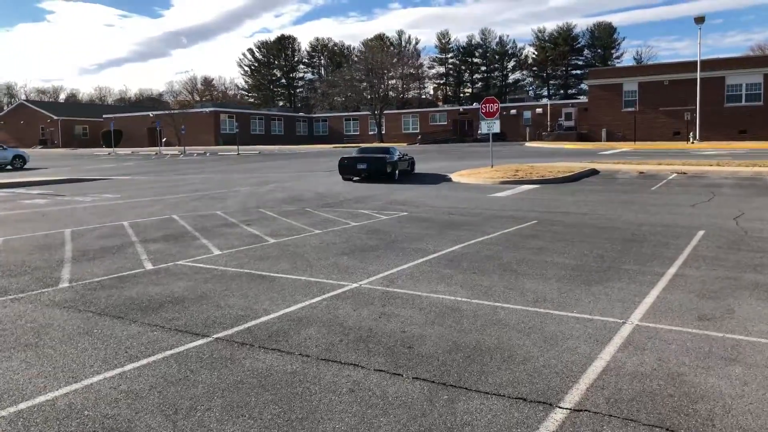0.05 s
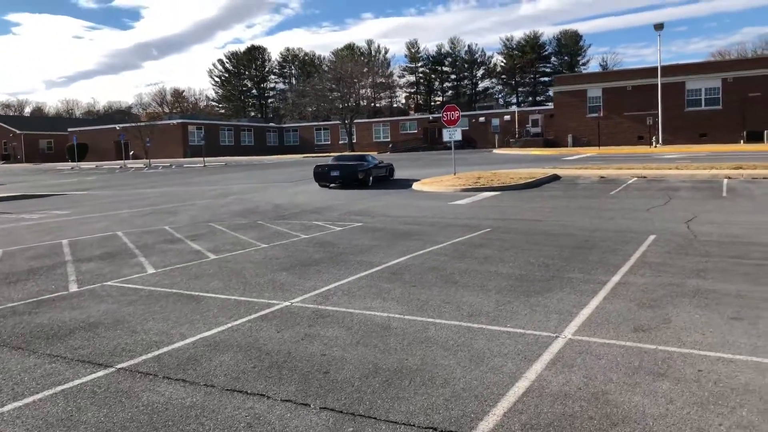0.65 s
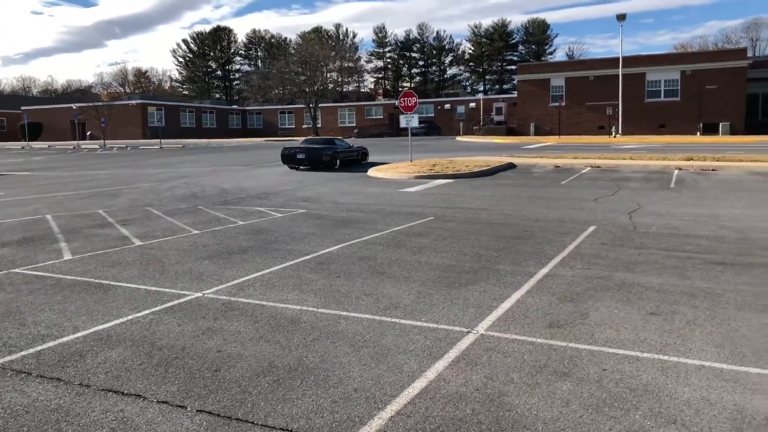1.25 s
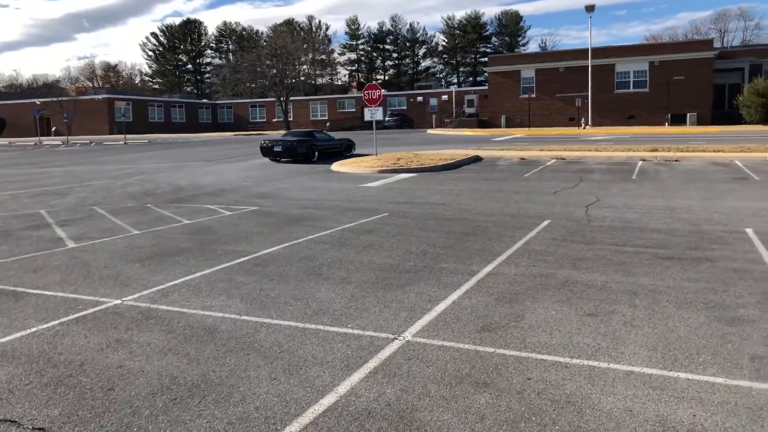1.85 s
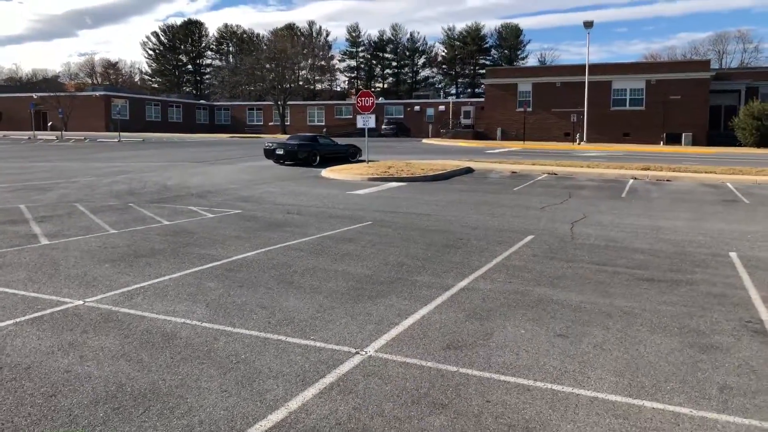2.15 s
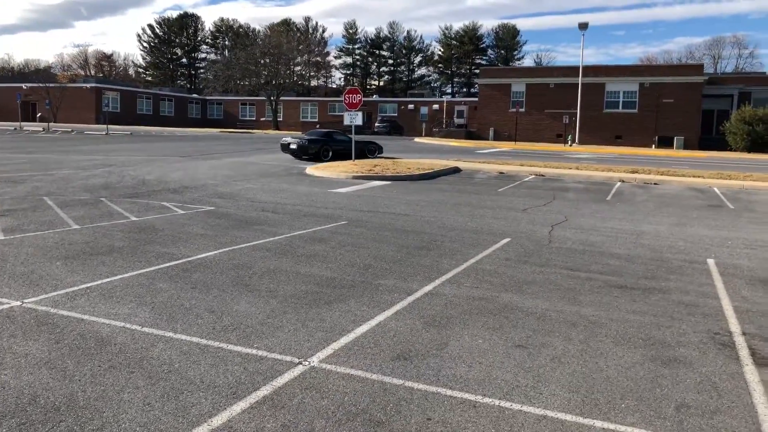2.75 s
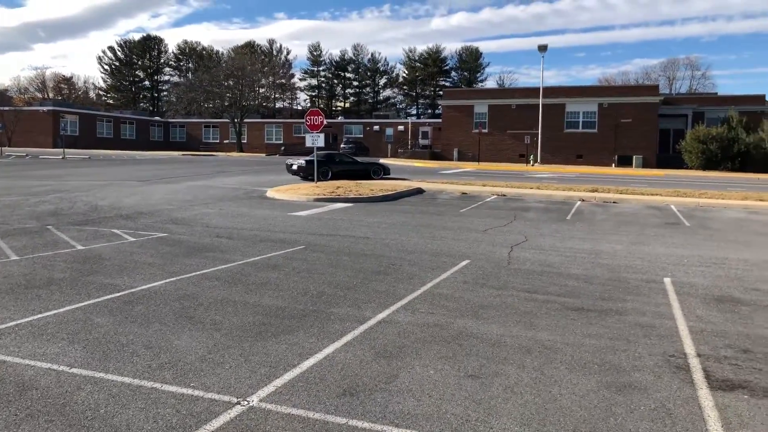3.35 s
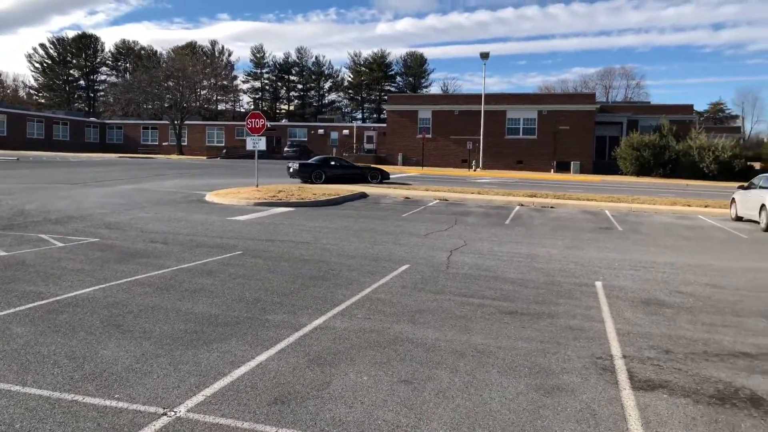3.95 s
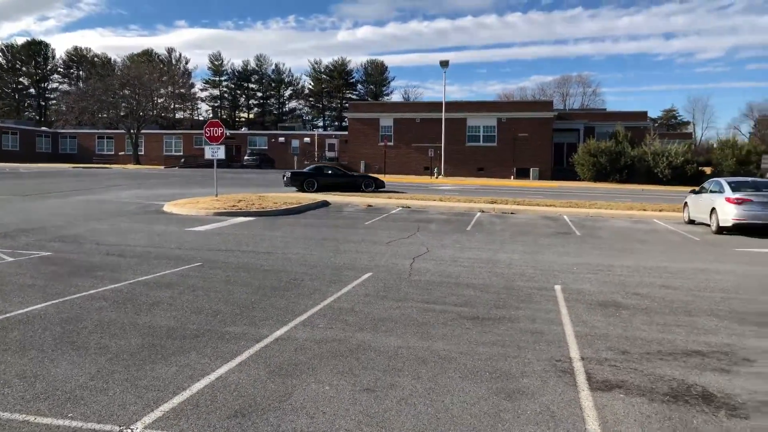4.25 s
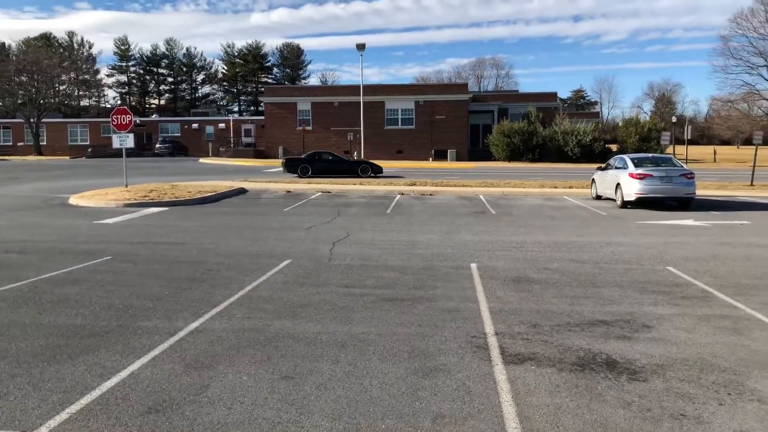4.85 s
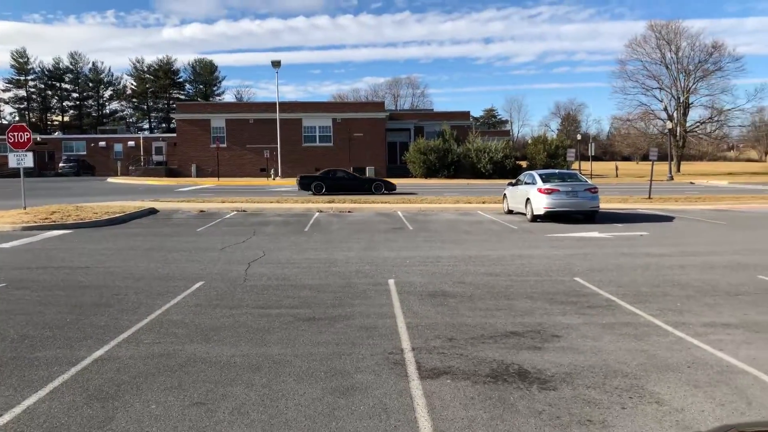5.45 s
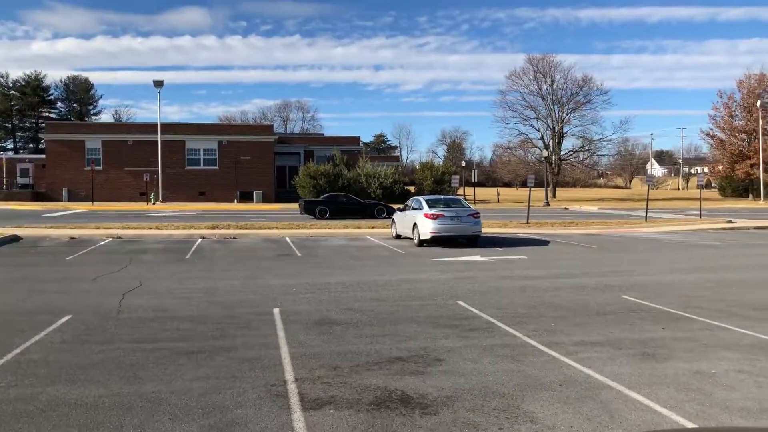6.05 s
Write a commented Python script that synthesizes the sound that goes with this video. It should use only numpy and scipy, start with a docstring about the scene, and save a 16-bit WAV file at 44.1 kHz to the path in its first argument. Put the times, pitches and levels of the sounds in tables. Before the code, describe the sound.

A sports car's open exhaust rumbles unevenly, then rises to a loud drone as it pulls away, with wind rustling the microphone.

```python
"""A V8 pulling away

A sports car with an open exhaust lopes across a parking lot, then pulls away and opens the throttle.
Each firing is a pressure pulse that excites the resonances of the pipes. At idle the uneven pulses
thump; as the revs rise they merge into a drone, and turbulent gas adds a rasping roar.
Gusts rustle and tick at the microphone over a wash of tyres, breeze and trees."""
import sys
import numpy as np
from scipy import signal
from scipy.fft import rfft, irfft
from scipy.io import wavfile
from scipy.ndimage import uniform_filter1d

SR = 44100
rng = np.random.default_rng(int(sys.argv[2]) if len(sys.argv) > 2 else 0)


def pcm_store(signal):
    """Save signal as 16-bit PCM."""
    levels = np.round(np.clip(np.atleast_2d(signal), -1, 1) * 32767)
    wavfile.write(sys.argv[1], SR, levels.astype(np.int16).T)


N = 269010
TIME = np.arange(N) / SR
IDLE_HZ = 56.2  # firings a second
TURN_START_S, TURN_LENGTH_S = 1.09, 1.42  # the tailpipes face the listener, then turn side-on

# engine speed: (time [s], firing rate [Hz])
FIRING_RATE = [(0.0, 48.0), (0.29, 49.1), (0.78, 47.2), (1.1, 46), (1.87, 60.5), (2.09, 48.5), (2.44, 53.4),
               (2.92, 45.1), (3.52, 60), (3.74, 58), (4.08, 66.5), (4.3, 79.2), (4.5, 83.8), (4.8, 96.5),
               (5.13, 96.2), (5.35, 103), (5.65, 117.8), (5.86, 119.7), (6.1, 130.5)]
def revs():
    """Engine speed as a frequency ratio, in octaves above idle."""
    return np.log2(curve(FIRING_RATE) / IDLE_HZ)


# how hard the engine works: (time [s], effort [dB])
EFFORT = [(0, 9.5), (.2, 4), (.46, 1.5), (.97, -4.5), (1.17, -7.5), (1.35, -4), (1.89, 0.5), (2.06, -9.5),
          (2.29, -12.5), (2.46, -10.5), (2.9, -7.5), (3.37, -2), (3.45, 2.1), (4.15, 2), (4.38, 8),
          (4.63, 5.5), (5.3, 3.5), (6.1, 7)]
def driven(db, per_effort, octave_db, behind_db, floored_db):
    """Source strength and directivity: a voice's gain follows effort, revs, heading and full throttle."""
    behind = 1 - ramp(TURN_START_S, TURN_LENGTH_S)
    floored = ramp(start_s=5.86, length_s=0.14)
    working_db = db + per_effort * curve(EFFORT) + octave_db * revs()
    return gain_of(working_db + behind_db * behind + floored_db * floored)


# the cylinders in firing order: (departure from the mean strength [ratio])
CYLINDERS = [0.92, -0.68, -0.33, -0.6, 0.46, -0.074, -0.73, 0.044]
def firings(turns, jitter_s=0.0003, scatter_per_octave=0.53):
    """Cyclic variation: burns differ, less so at high revs. Gives the uneven and even pulse trains."""
    at = np.flatnonzero(np.diff(np.floor(turns)) > 0)
    burn, late = rng.standard_normal((len(at), 2)).T
    sizes = np.resize(CYLINDERS, len(at)) + scatter_per_octave ** revs()[at] * burn
    seconds = TIME[at] + jitter_s * late
    return impulses(seconds, sizes), impulses(seconds, np.ones(len(at)))


# pipe responses, low to high, the boom at low and at high revs: (frequency [Hz], relative gain [dB])
BOOM = [(20, -59.5), (38, -28), (48, -12), (60, 3.5), (80, 5), (100, -5), (122, -2), (145, -16.5),
        (200, -38)]
BOOM_REVVED = [(20, -51), (40, -27), (52, 0.5), (62, -7.5), (78, -2.5), (98, 0.5), (120, -8.5), (145, -40),
               (200, -79)]
BURBLE = [(90, -47.5), (130, 0), (155, 2), (185, 9), (235, 2.5), (260, -14.5), (330, -25.5)]
HOLLOW = [(160, -36), (190, -4), (215, 1), (238, -5), (270, -26), (330, -43)]
GROWL = [(200, -18.5), (245, -10), (278, -1), (298, 3.5), (335, -6), (375, -11), (420, -25), (600, -31.5)]
BARK = [(250, -46.5), (335, 2), (388, 6), (440, -6), (515, -6), (560, -0.5), (600, -1), (645, 1), (715, -5),
        (775, -2), (900, -27), (1300, -36), (2500, -56)]
def exhaust(turns, even_share=0.77):
    """Source and filter: uneven firings, smeared by reflections, ring five resonances of the pipes."""
    uneven, even = firings(turns)
    boom_pulses = reverberated(uneven, tail_db=1.5, t60=0.93)
    mid_pulses = reverberated(uneven, tail_db=2.0, t60=0.25)
    bark_pulses = reverberated(uneven + even_share * even, tail_db=5.5, t60=0.35)
    hollow_pulses = reverberated(uneven, tail_db=5.5, t60=0.6)
    revved = np.clip((curve(FIRING_RATE) - 65) / 30, 0, 1)
    deep = colour(boom_pulses * (1 - revved), BOOM) + colour(boom_pulses * revved, BOOM_REVVED)
    boom = steadied(deep, 0.51)
    boom *= driven(-28, per_effort=-0.22, octave_db=3, behind_db=0.2, floored_db=-2)
    burble = steadied(colour(mid_pulses, BURBLE), 0.042)
    burble *= driven(-34, per_effort=0.53, octave_db=-0.5, behind_db=2, floored_db=7.5)
    hollow = steadied(colour(hollow_pulses, HOLLOW), 0.1)
    hollow *= driven(-39.5, per_effort=0.35, octave_db=-2.5, behind_db=-14, floored_db=2)
    growl = steadied(heated(mid_pulses, GROWL), 0.051)
    growl *= driven(-28, per_effort=1.31, octave_db=-9, behind_db=-10, floored_db=11.5)
    bark = steadied(colour(bark_pulses, BARK), 0.19)
    bark *= driven(-46.5, per_effort=1.38, octave_db=5, behind_db=-0.5, floored_db=13)
    return boom + burble + hollow + growl + bark


def heated(x, response, cool_pitch=0.94, hot_pitch=1.023, hot_octaves=0.67):
    """Sound travels faster in hot gas, so a resonance shifts upwards as the revs heat the pipe."""
    hot = np.clip(revs() / hot_octaves, 0, 1)
    cool_ring = colour(x * np.sqrt(1 - hot), [(hz * cool_pitch, db) for hz, db in response])
    hot_ring = colour(x * np.sqrt(hot), [(hz * hot_pitch, db) for hz, db in response])
    return cool_ring + hot_ring


# the engine lopes off the throttle and fires evenly while it pulls: (time [s], lope [0-1])
LOPING = [(.05, 0.96), (1.1, 0.63), (1.3, 0.12), (1.88, 0.18), (2.02, 0.4), (2.85, 0.83), (3.08, 0)]
# pipe resonances: (frequency [Hz], peak gain [dB], bandwidth [Hz])
DRONE_MODES = [(51, -24, 28), (78.8, -19.5, 12.8), (116.2, -21.5, 14), (157, -24, 22), (196.7, -23, 21),
               (220, -24.5, 15), (258.5, -27, 11), (288.4, -20, 12.5), (324.6, -22, 15), (384, -38, 20),
               (645, -46, 50), (770, -47, 50)]
# harmonics 1, 2, ...: (relative level [dB], gain loping [dB], from behind [dB], at full throttle [dB])
HARMONICS = [(-2, -14, 4, 2.5), (-6, -13, 8, 7), (-12, -0.5, 9.5, 12), (-12, -8, 3, 3),
             (-18.5, 15.5, -8.5, 27), (-26, 2, 1, 31)]
def drone(turns, waver_db=2.0, per_effort=0.93):
    """Forced vibration: each harmonic of the firing rate swells as it passes a pipe resonance."""
    out, firing_hz = np.zeros(N), curve(FIRING_RATE)
    for k, (db, loping_db, behind_db, floored_db) in enumerate(HARMONICS, 1):
        power = sum(gain_of(mode_db) ** 2 * resonance(k * firing_hz, hz, width)
                    for hz, mode_db, width in DRONE_MODES)
        level = driven(db, per_effort, 0, behind_db, floored_db)
        level *= gain_of(loping_db * curve(LOPING) + waver_db * wander(0.031))
        out += np.sqrt(2 * power) * level * np.sin(2 * np.pi * (k * turns + rng.random()))
    return out


# lulls between the lumps of the idle: (centre time [s], length [s], exhaust gain [dB])
LULLS = [(0.045, 0.033, -8.5), (0.47, 0.072, -3), (0.562, 0.043, -1.5), (0.796, 0.022, -7),
         (1.013, 0.045, -2), (1.125, 0.087, -3.5), (1.222, 0.036, -4), (1.47, 0.019, -7),
         (1.546, 0.029, -6), (1.59, 0.021, -0.5), (2.114, 0.081, -7.5), (2.26, 0.062, -6),
         (2.39, 0.021, -6), (2.59, 0.047, -5), (2.693, 0.035, -1.5), (2.863, 0.015, -15),
         (3.273, 0.014, -2)]
def lope(weak_per_s=4., dip_s=0.026, depth_db=-7.5, gone_octaves=0.18, sag_db=-0.5):
    """Amplitude modulation: the exhaust sags off the throttle, in lulls and on weak burns near idle."""
    weak_burns = (rng.random(N) < weak_per_s / SR) * rng.uniform(0.22, 1.0, N)
    dips = signal.oaconvolve(weak_burns, signal.windows.hann(int(2 * dip_s * SR)), "same")
    near_idle = np.clip(1 - revs() / gone_octaves, 0, 1)
    lull_db = sum(db * swell(s, length) for s, length, db in LULLS)
    return gain_of(lull_db + sag_db * curve(LOPING) + depth_db * np.minimum(dips, 2) * near_idle)


# hard firings, in the lope and at the first push of the throttle: (time [s], relative level [dB])
CHUFFS = [(0.064, -25), (0.123, -2), (0.155, -2), (0.211, 3), (0.268, 3), (0.316, -13), (0.388, -2.5),
          (0.503, -1.5), (0.584, -7), (0.617, -6.5), (0.655, -5), (0.705, -6), (0.827, -8.5), (0.925, -6),
          (0.963, -4.5), (1.05, -7.5), (1.185, -11), (1.362, -7), (1.432, -3), (1.514, -11), (1.565, -7),
          (1.683, -5), (1.731, -2.5), (1.765, -17), (1.864, -0.5), (4.323, -2), (4.372, 5), (4.385, 1),
          (4.423, 4.5)]
# the pipe modes they ring: (frequency [Hz], relative level [dB], time constant [s])
CHUFF_MODES = [(86, -8, 0.0078), (149.6, -3.5, 0.0051), (256, -9.5, 0.0033), (344, -13, 0.0018),
               (512, -22.5, 0.0075), (666, -29, 0.0013)]
def chuffs(level_db=-10.0, detune=0.068, thinning_db=18., bark_hz=322.0):
    """Damped modes: a hard firing thumps, never at quite the same pitch; higher revs thin its bass."""
    t, out = TIME[:SR // 5], np.zeros(N + SR)
    octaves = np.maximum(revs(), 0)
    detunings = 1 + detune * rng.standard_normal((len(CHUFFS), len(CHUFF_MODES)))
    for (s, db), shifts in zip(CHUFFS, detunings):
        at = round(s * SR)
        for (hz, mode_db, ring_s), shift in zip(CHUFF_MODES, shifts):
            thin_db = thinning_db * octaves[at] * min(np.log2(hz / bark_hz), 0)
            ring = damped_tone(t, hz * shift, ring_s)
            out[at:][:len(t)] += gain_of(db + level_db + mode_db + thin_db) * ring
    return out[:N]


# tones of the two cylinder banks: (order [multiple of the eight-firing cycle rate])
BANK_ORDERS = (6, 10, 13, 14, 18, 19, 26, 28)
# a resonance for each order, which swells only if the revs bring it near:
# (level [dB], frequency [Hz], Gaussian width [Hz])
BANK_RESONANCES = [(-19, 106, 19), (-21.5, 110, 9.6), (-36, 174, 18), (-23.5, 208.5, 11.2), (-27.5, 260, 8),
                   (-20.5, 301, 14), (-33.5, 313, 6.7), (-27, 530, 10)]
def bank_tones(turns, waver_db=1.0):
    """Engine orders: each bank's uneven pulse spacing adds tones between the firing harmonics."""
    pulling_away = ramp(TURN_START_S + TURN_LENGTH_S, TURN_LENGTH_S)
    out = np.zeros(N)
    for order, (db, hz, width) in zip(BANK_ORDERS, BANK_RESONANCES):
        k = order / len(CYLINDERS)
        level = gain_of(db - waver_db * wander(0.033)) * gaussian(k * curve(FIRING_RATE), hz, width)
        out += level * np.sin(2 * np.pi * (k * turns + rng.random()))
    return out * pulling_away


# gas rushing through the pipes: (frequency [Hz], relative gain [dB])
RUSH_SPECTRUM = [(450, -29), (620, 3.5), (780, -8), (930, -0.5), (1120, -8), (1350, -5.5), (1700, -23),
                 (2600, -21)]
def rush(turns, pulsing=0.55):
    """Flow noise: hot gas roars in the pipes, surging with every firing and growing with the revs."""
    surge = 1 + pulsing * np.cos(2 * np.pi * turns)
    roar = evened(colour(surge * rng.standard_normal(N), RUSH_SPECTRUM))
    return roar * driven(-59, per_effort=-0.82, octave_db=17.5, behind_db=3, floored_db=6.5)


# turbulence at the tailpipe: (frequency [Hz], relative gain [dB])
RASP_SPECTRUM = [(600, -14), (1100, -17), (1550, -3), (1720, 4.5), (1920, -9), (2100, 10), (2280, 0),
                 (3000, -8), (3700, 0.5), (4350, 7.5), (5000, -7), (6300, -2.5), (9000, -15), (16000, -27)]
def rasp(turns, steady_flow=0.63, uneven_db=1.0, throb_db=2.0):
    """Jet noise: each firing blows out a puff of turbulent gas; the puffs throb once a crank turn."""
    crank_turns = 2 * turns / len(CYLINDERS)
    puffs = steady_flow + np.exp(-(turns % 1))
    puffs *= gain_of(uneven_db * wander(0.0087) + throb_db * np.cos(2 * np.pi * crank_turns))
    jet = evened(colour(puffs * rng.standard_normal(N), RASP_SPECTRUM))
    return jet * driven(-56, per_effort=0.5, octave_db=1, behind_db=-32, floored_db=19.5)


def reverberated(x, tail_db, t60, first_s=0.004, echoes_per_s=1500, places=6):
    """Scattering: asphalt, kerbs and parked cars give each pulse a tail that changes as the car moves."""
    t, tail = TIME[:SR // 3], np.zeros(N)
    place = np.linspace(0, places - 1, N)
    for k in range(places):
        echoes = rng.standard_normal(len(t)) * (rng.random(len(t)) < echoes_per_s / SR)
        echoes *= gain_of(-60 * t / t60) * (t > first_s)
        here = np.sqrt(np.maximum(1 - abs(place - k), 0))
        tail += signal.oaconvolve(x * here, echoes / np.linalg.norm(echoes))[:N]
    return x + gain_of(tail_db) * tail


# spits of hiss: (centre time [s], relative level [dB], nominal length [s], scratch frequency [Hz])
SPITS = [(0.127, -55, 0.028, 5300), (0.215, -50, 0.0085, 6950), (0.258, -57, 0.018, 5330),
         (0.587, -57.5, 0.032, 10800), (0.709, -54, 0.022, 5300), (0.829, -55, 0.021, 9500),
         (0.922, -56, 0.019, 11400), (0.956, -54, 0.017, 10500), (1.054, -55.5, 0.018, 4770),
         (1.19, -59, 0.016, 5300), (1.249, -49.5, 0.02, 9000), (1.301, -52, 0.033, 10900),
         (1.378, -50, 0.027, 10700), (1.432, -55, 0.014, 9400), (1.502, -57, 0.021, 9300),
         (1.57, -50.5, 0.013, 6900), (1.63, -55, 0.015, 9300), (1.732, -51, 0.021, 9200),
         (1.767, -49, 0.012, 6000), (1.816, -53, 0.013, 10700), (1.863, -51.5, 0.013, 4700),
         (2.045, -55, 0.018, 5500), (2.144, -57, 0.03, 6200), (2.203, -55, 0.022, 5200),
         (2.352, -48.5, 0.03, 9400), (2.538, -49, 0.012, 11000), (5.49, -56, 0.0058, 6440),
         (5.61, -42, 0.006, 5000), (5.737, -53, 0.011, 6400), (5.996, -38, 0.012, 4700)]
# the hiss they share: (frequency [Hz], relative gain [dB])
SPIT_SPECTRUM = [(2000, -1), (4000, 9), (6500, 4), (8600, 2.5), (9550, 4.5), (10200, -7), (11200, -5),
                 (12500, -4), (16000, -8)]
def spits(hiss_db=4.5, stretch=0.74, scratch_width_hz=1100.0):
    """Gated noise: thin hiss spits mostly with the lumps of the idle, each time with a narrow scratch."""
    grains, power, scratch = grainy(spread_db=4.5), np.zeros(N), np.zeros(N)
    size = SR // 5
    bins = np.fft.rfftfreq(size, 1 / SR)
    for s, db, length, hz in SPITS:
        burst = swell(s, length * stretch) * gain_of(db) ** 2
        span = np.clip(round(s * SR) - size // 2, 0, N - size) + np.arange(size)
        band = evened(irfft(rfft(grains[span]) * resonance(bins, hz, scratch_width_hz), size))
        scratch[span] += band * np.sqrt(burst[span])
        power += burst
    return gain_of(hiss_db) * np.sqrt(power) * evened(colour(grains, SPIT_SPECTRUM)) + scratch


def chirp(s=2.353, level_db=-50.0, length=0.022, hz=9450., skirt_hz=900.):
    """Narrow-band noise has a pitch: one of the spits carries a small high chirp."""
    band = colour(rng.standard_normal(N), [(hz - skirt_hz, -30), (hz, 0), (hz + skirt_hz, -30)])
    return gain_of(level_db) * np.sqrt(swell(s, length)) * evened(band)


# gusts: (centre time [s], body level [dB], fizz level [dB], length [s], body frequency [Hz])
GUSTS = [(0.366, -44, -54, 0.072, 1560), (0.462, -41, -58, 0.02, 1400), (0.651, -50, -46, 0.029, 1890),
         (1.935, -33.5, -30.5, 0.037, 1120), (1.992, -39, -37.5, 0.028, 1070),
         (2.44, -40, -32, 0.046, 1570), (2.523, -37.5, -32, 0.03, 1170), (2.666, -41, -33, 0.021, 1363),
         (2.802, -34.5, -32, 0.038, 1390), (2.904, -35.5, -34.5, 0.038, 881),
         (3.022, -34.5, -34.5, 0.047, 764), (3.112, -40, -34.5, 0.037, 920),
         (3.228, -38, -38.5, 0.027, 849), (3.35, -35, -42, 0.032, 838.5), (3.439, -41.5, -36, 0.028, 1352),
         (3.522, -48, -42.5, 0.088, 964.7), (3.938, -67, -40, 0.039, 1324),
         (4.068, -49, -36.5, 0.038, 1240), (4.154, -60, -35.5, 0.031, 1500),
         (4.257, -47, -35, 0.027, 965.4), (4.378, -62, -35, 0.061, 892), (4.483, -43, -36, 0.045, 907.5),
         (4.608, -31, -37, 0.043, 1020), (4.722, -38.5, -35.5, 0.047, 956.6), (4.84, -44, -37, 0.038, 1023),
         (4.953, -46, -42, 0.045, 937), (5.616, -50, -42, 0.038, 884)]
# their fizz: (frequency [Hz], relative gain [dB])
FIZZ_SPECTRUM = [(1500, 3.5), (2300, 3), (3100, -1.5), (4000, -0.5), (5200, -8.5), (7000, -13),
                 (10000, -21.5), (16000, -44)]
def gusts(width_octaves=0.61):
    """Wind noise: brief swells of crackly rustle, each a broad midrange band under a high fizz."""
    grains = grainy(spread_db=4.0, per_s=1500., fade_s=0.00098, bed=1.0)
    body, fizz_power = np.zeros(N), np.zeros(N)
    size = SR // 2
    log_hz = np.log2(np.fft.rfftfreq(size, 1 / SR) + 1)
    for s, body_db, fizz_db, length, hz in GUSTS:
        power = swell(s, length)
        span = round(s * SR) - size // 2 + np.arange(size)
        band = evened(irfft(rfft(grains[span]) * gaussian(log_hz, np.log2(hz), width_octaves), size))
        body[span] += band * np.sqrt(power[span]) * gain_of(body_db)
        fizz_power += power * gain_of(fizz_db) ** 2
    return body + np.sqrt(fizz_power) * evened(colour(grains, FIZZ_SPECTRUM))


# ticks at the microphone: (time [s], snap level [dB], frequency [Hz], relative edge level [dB])
TICKS = [(0.102, -22.5, 1290, -37), (0.251, -26, 1500, -40), (0.275, -23.5, 1360, -47),
         (0.338, -20.5, 1210, -57), (0.354, -22, 1420, -61), (0.377, -20, 1560, -38.5),
         (0.424, -31, 1100, -34.5), (0.45, -24.5, 1230, -47), (0.459, -27, 1350, -38),
         (0.643, -18, 1730, -44), (0.695, -23.5, 1500, -45), (1.132, -30, 1250, -40),
         (1.532, -26.5, 1040, -48), (1.86, -22, 1400, -42), (1.914, -19, 1170, -40),
         (1.943, -21, 1700, -39), (1.991, -15.5, 1280, -36), (2.235, -30, 1100, -32.5),
         (2.434, -7.5, 1580, -36), (2.586, -23.5, 1700, -37), (2.639, -21.5, 1600, -31),
         (2.783, -15.5, 1450, -35), (2.788, -20, 1300, -40), (2.801, -17, 1900, -41),
         (2.888, -23, 1099, -41), (2.965, -22.5, 700, -44), (3.112, -17, 2400, -42),
         (3.216, -31, 1000, -37), (3.228, -20.5, 2080, -36), (3.335, -21, 914, -37), (3.36, -22, 1490, -44),
         (3.433, -25, 1393, -47), (4.079, -24, 1800, -40), (4.143, -17.5, 2120, -42),
         (4.54, -21.5, 710, -56), (4.606, -24, 1450, -48)]
def ticks(cycles=0.28, growth=0.45, edge_s=0.0021):
    """Heavily damped transients: a snap of a cycle or two with a crisp edge; harder ones ring longer."""
    t, out = TIME[:SR // 50], np.zeros(N + SR)
    band = signal.butter(4, [1500, 7000], "bandpass", fs=SR, output="sos")
    for s, db, hz, edge_db in TICKS:
        ring_s = cycles / hz * gain_of(growth * (db + 26.5))
        snap = damped_tone(t, hz, ring_s)
        edge = evened(signal.sosfilt(band, rng.standard_normal(len(t)))) * np.exp(-t / edge_s)
        out[round(s * SR):][:len(t)] += gain_of(db) * snap + gain_of(edge_db - 1) * edge
    return out[:N]


# open-air wash: (time [s], level [dB])
AIR_LEVEL = [(0, -35.5), (.3, -41.5), (.9, -43.5), (1.85, -39), (2.1, -43.5), (2.7, -39.5), (3.7, -44.5),
             (4.02, -43.5), (4.8, -39.5), (5.2, -44), (5.6, -35), (5.88, -36), (6.1, -54)]
# its colour: (frequency [Hz], relative gain [dB])
AIR_SPECTRUM = [(20, -12.5), (200, 16), (700, 5.5), (1350, 1), (2200, -1), (3100, -5.5), (4200, -5),
                (5200, -10.5), (6500, -10), (9000, -19), (12500, -23.5), (16000, -27)]
def air(flutter_db=1.5):
    """Broadband ambient noise: tyres, breeze and trees add up to a lightly fluttering wash."""
    wash = evened(colour(grainy(spread_db=1.5), AIR_SPECTRUM))
    return wash * gain_of(curve(AIR_LEVEL) + flutter_db * wander(0.0027))


# the finest hiss: (time [s], level [dB], flicker [dB])
TOP_HISS = [(0, -76, 5), (1.15, -60, 10), (1.35, -59.5, 12), (2.5, -59, 8.5), (3.68, -63, 9),
            (3.78, -53.5, 7.5), (4.95, -60, 3.5), (5.2, -62, -3), (5.45, -51.5, 5), (6.1, -78, -3)]
# its colour: (frequency [Hz], relative gain [dB])
TOP_HISS_SPECTRUM = [(5000, -6), (8500, -5), (11000, -8.5), (13500, -17), (15500, -9), (16000, -6)]
def top_hiss(flicker_s=0.028):
    """Randomly modulated noise: a thin high hiss flickers, then steadies as the car gathers speed."""
    flicker_db = curve(TOP_HISS, column=2) * np.clip(wander(flicker_s), -2, 1)
    hiss = evened(colour(rng.standard_normal(N), TOP_HISS_SPECTRUM))
    return hiss * gain_of(curve(TOP_HISS) + flicker_db)


def hushed(x, depth_db=-7.0):
    """Time-varying shelf filter: the treble of the background sinks in each lull."""
    lull = sum(swell(s, length) for s, length, _ in LULLS)
    return shelved(x, depth_db * lull, above_hz=5200)


# reflections off things near the microphone: (delay [ms], relative level [dB])
NEAR_ECHOES = [(1.45, -19), (2.3, -34), (3.7, -20.5), (5.9, -15.5)]
def echoed(x):
    """Comb filtering: short echoes interfere with the direct sound and give it a hollow, ribbed colour."""
    echoes = sum(gain_of(db) * np.pad(x, (round(ms * SR / 1000), 0))[:N] for ms, db in NEAR_ECHOES)
    power = 1 + sum(gain_of(db) ** 2 for _, db in NEAR_ECHOES)
    return (x + echoes) / np.sqrt(power)


def suppressed(x, open_db=-17.5, slope=0.19, deepest_db=-4.0, window_s=0.0072):
    """Downward expansion: a noise suppressor turns the treble down when the whole sound falls quiet."""
    level_db = 10 * np.log10(abs(smooth(x ** 2, window_s)) + 1e-12)
    cut_db = np.clip(slope * (level_db - open_db), deepest_db, 0)
    return shelved(x, cut_db, above_hz=5500)


def shelved(x, db, above_hz):
    """Zero-phase shelf filter: changes the level of the treble alone."""
    treble = signal.sosfiltfilt(signal.butter(2, above_hz, "highpass", fs=SR, output="sos"), x)
    return x + treble * (gain_of(db) - 1)


def colour(x, spectrum, size=16384):
    """Minimum-phase filter with the given spectrum: every pulse rings after it strikes."""
    hz, db = np.transpose(spectrum)
    log_hz = np.log(np.fft.rfftfreq(size, 1 / SR) + 1)
    gain = gain_of(np.interp(log_hz, np.log(hz), db, right=-90))
    cepstrum = irfft(np.log(gain))
    cepstrum[1:size // 2] *= 2  # folding onto positive time makes the filter causal
    cepstrum[size // 2 + 1:] = 0
    impulse_response = irfft(np.exp(rfft(cepstrum)))[:size // 2]
    return signal.oaconvolve(x, impulse_response)[:N]


def grainy(spread_db, per_s=1800.0, fade_s=0.0019, bed=0.23):
    """Shot process: tiny noise grains of uneven size start sharply and fade fast over a steady bed."""
    sizes = gain_of(spread_db * np.minimum(rng.exponential(1, N), 5))
    sizes *= rng.random(N) < per_s / SR
    power = signal.lfilter([1], [1, -np.exp(-1 / (fade_s * SR))], sizes ** 2)
    return evened(rng.standard_normal(N) * np.sqrt(bed + power / power.mean()))


def swell(s, length, rise=2.87, fall=2.32):
    """Power envelope of a burst, `length` seconds wide at half power; it rises more steeply than it ends."""
    offset = 2 * (TIME - s) / length
    near = abs(offset) < 20
    power = np.zeros(N)
    power[near] = .5 ** (abs(offset[near]) ** np.where(offset[near] < 0, rise, fall))
    return power


def damped_tone(t, hz, ring_s):
    """Damped oscillation whose envelope peaks at 1 after ring_s."""
    return t / ring_s * np.exp(1 - t / ring_s) * np.sin(2 * np.pi * hz * t)


def resonance(hz, centre_hz, width_hz):
    """Lorentzian curve of height 1."""
    return 1 / (1 + (2 * (hz - centre_hz) / width_hz) ** 2)


def gaussian(x, centre, width):
    """Bell curve of height 1."""
    return np.exp(-.5 * ((x - centre) / width) ** 2)


def impulses(seconds, sizes):
    """Single-sample pulses at the given times."""
    return np.bincount(np.clip(np.round(seconds * SR).astype(int), 0, N - 1), sizes, N)


def wander(seconds):
    """Low-passed random fluctuation of rms 1."""
    return evened(smooth(rng.standard_normal(N + SR), seconds)[SR // 2:][:N])


def steadied(x, seconds):
    """Automatic gain control: keeps the quick beats but holds the slow level at rms 1."""
    return x / np.sqrt(abs(smooth(x ** 2, seconds)) + 1e-12)


def smooth(x, seconds):
    """Triangular moving average."""
    size = max(int(seconds * SR), 1)
    return uniform_filter1d(uniform_filter1d(x, size), size)


def curve(rows, column=1):
    """Linear interpolation of a table column at every sample."""
    rows = np.asarray(rows)
    return np.interp(TIME, rows[:, 0], rows[:, column])


def ramp(start_s, length_s):
    """Linear rise from 0 to 1."""
    return np.clip((TIME - start_s) / length_s, 0, 1)


def evened(x):
    """Normalisation to rms 1."""
    return x / np.sqrt(np.mean(x ** 2) + 1e-20)


def gain_of(db):
    """Decibels to amplitude."""
    return 10 ** (np.asarray(db) / 20)


def scene():
    """Superposition of the car, the gusts and the open air."""
    firing_hz = curve(FIRING_RATE) * (1 + 0.0029 * wander(0.034))
    turns = np.cumsum(firing_hz) / SR  # phase: one turn per firing
    rumble = lope() * (drone(turns) + exhaust(turns)) + bank_tones(turns) + chuffs()
    rustle = echoed(spits() + chirp() + gusts() + hushed(air() + top_hiss()))
    return (rumble + rush(turns) + rasp(turns) + rustle + ticks())[None]


def record(dry):
    """Transduction: noise suppression, the microphone's bass cut and soft saturation, then a band limit."""
    bass_cut = signal.butter(6, 42., "highpass", fs=SR, output="sos")
    thinned = signal.sosfilt(bass_cut, suppressed(dry))
    rounded = thinned / (1 + (thinned / .75) ** 6) ** (1 / 6)
    band_limit = signal.firwin(511, 15800, window=("kaiser", 9), fs=SR)
    return signal.oaconvolve(rounded, band_limit[None], "same")


dry = scene()
out = record(dry)
pcm_store(out)
```